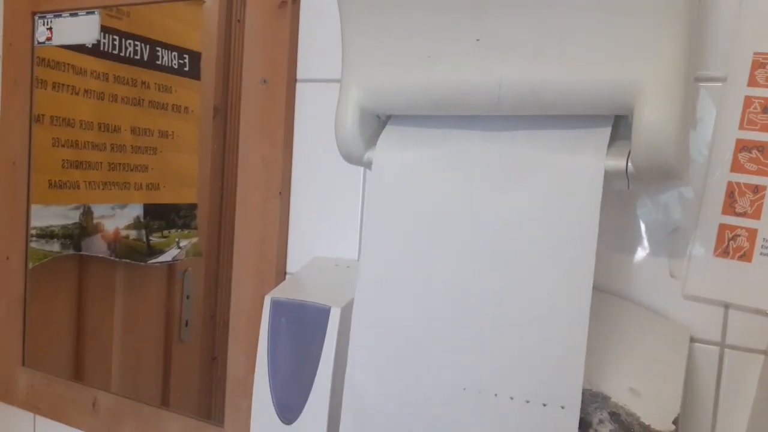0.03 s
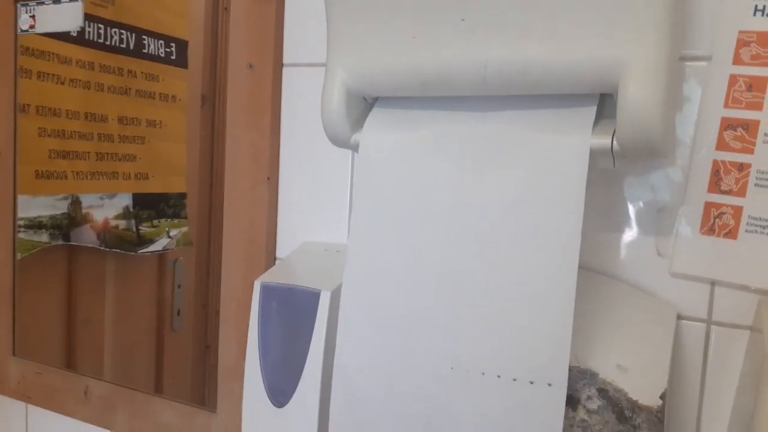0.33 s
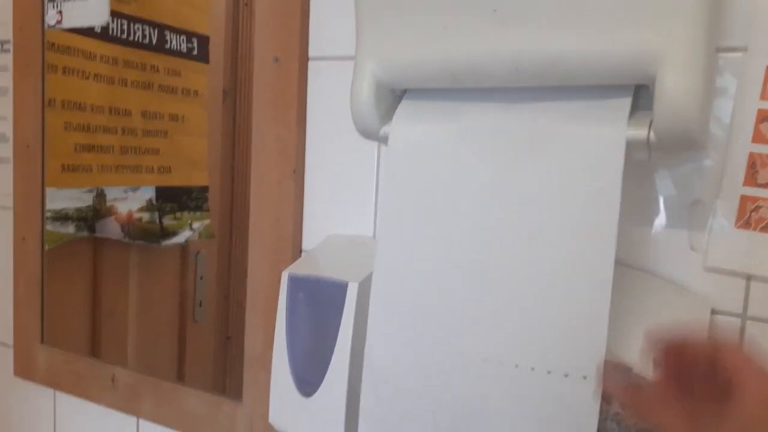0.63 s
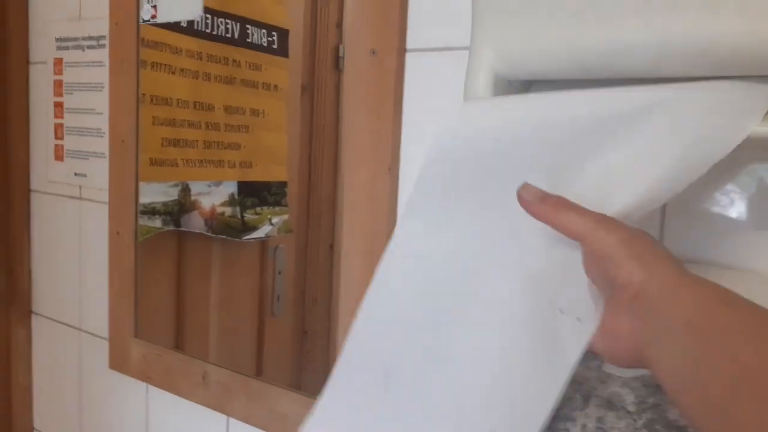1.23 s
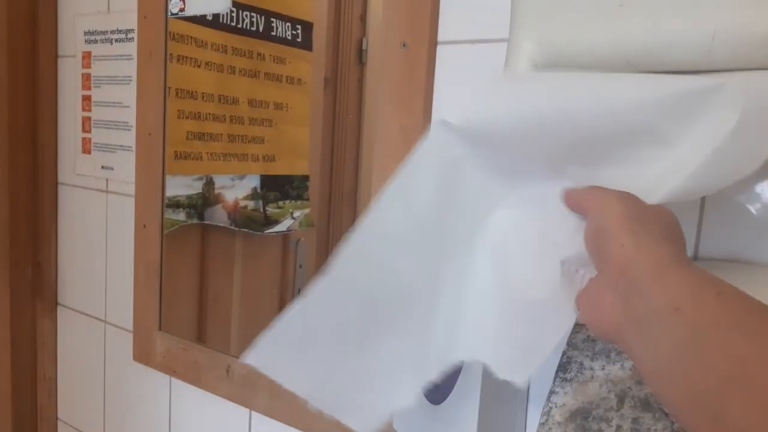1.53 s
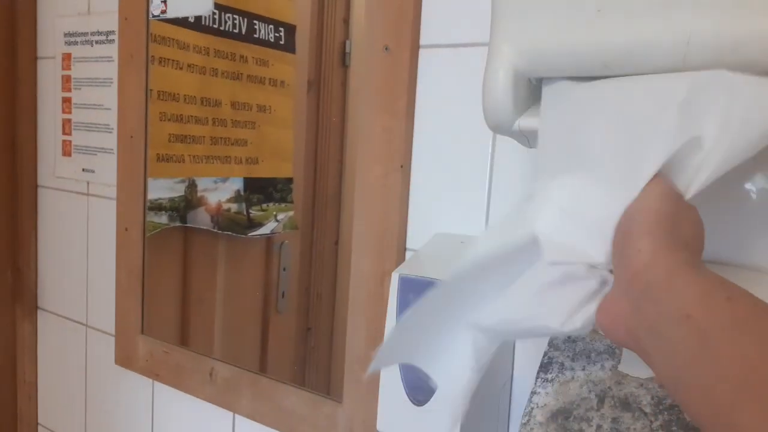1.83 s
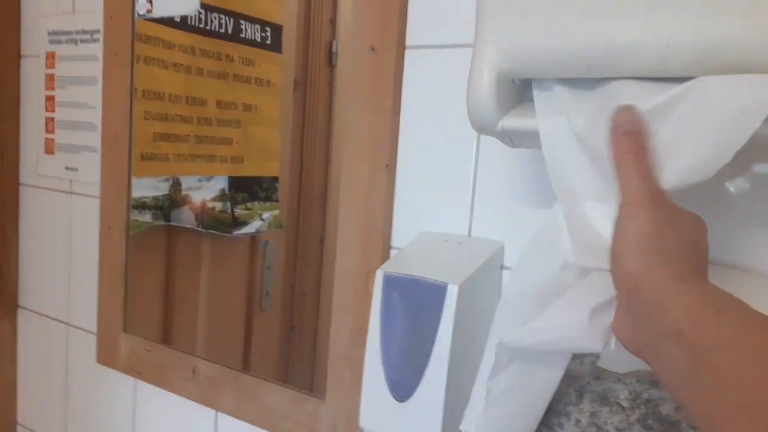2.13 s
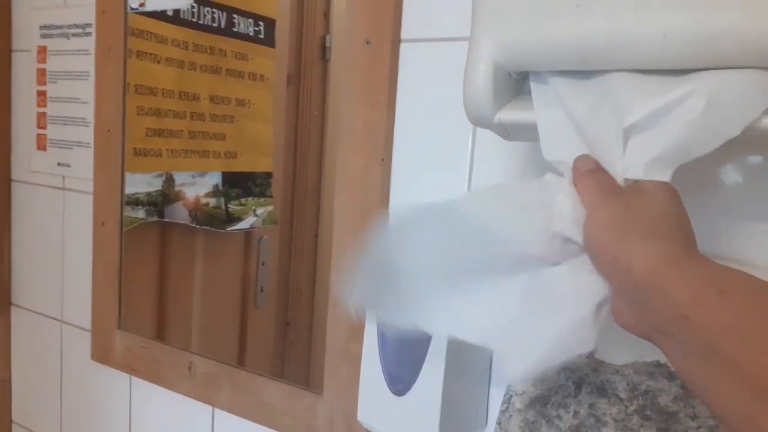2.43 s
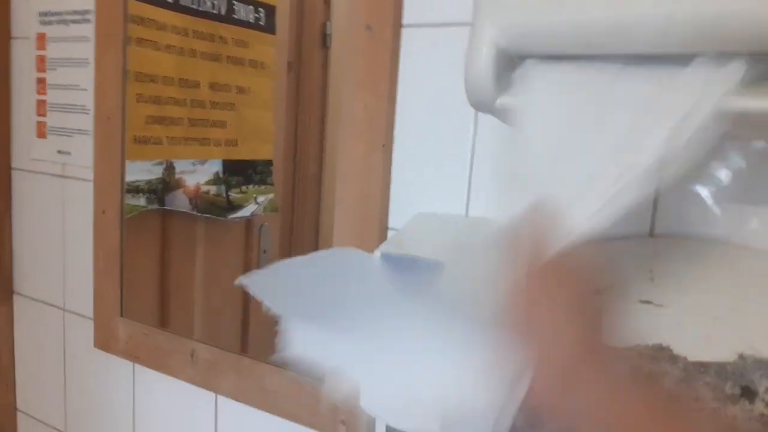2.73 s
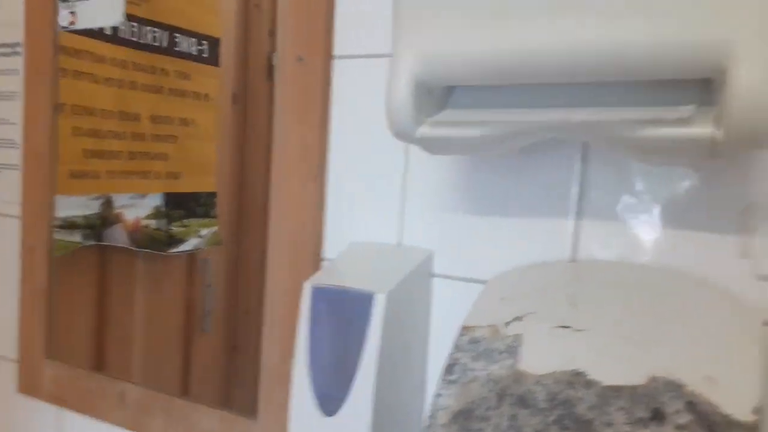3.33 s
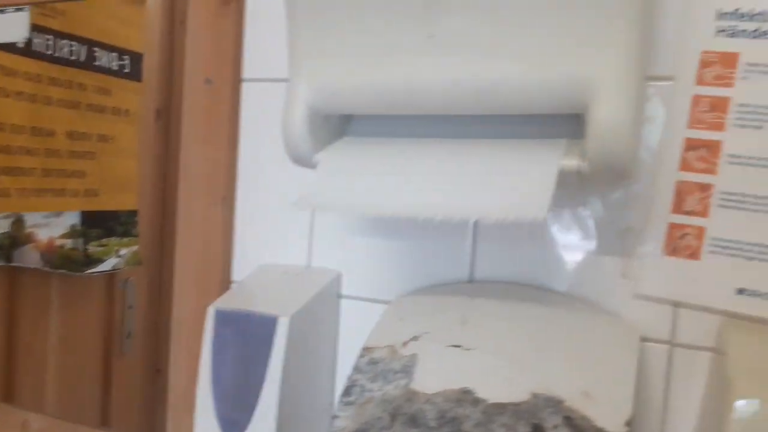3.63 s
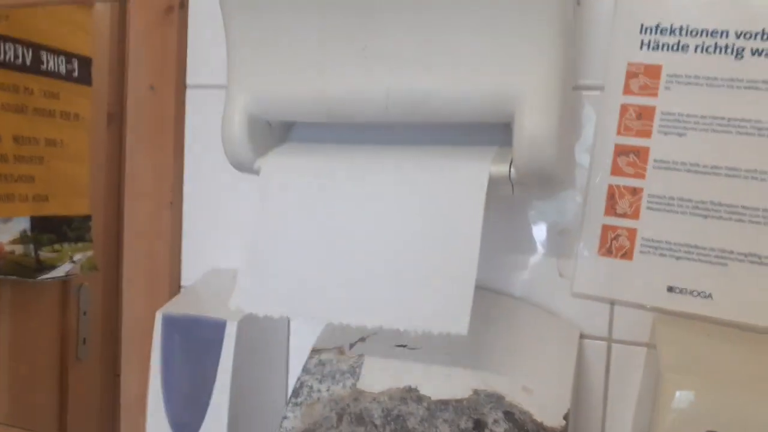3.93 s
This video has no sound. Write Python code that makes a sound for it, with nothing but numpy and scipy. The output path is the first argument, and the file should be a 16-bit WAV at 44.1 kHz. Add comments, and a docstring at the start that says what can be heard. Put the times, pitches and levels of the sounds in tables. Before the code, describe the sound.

An automatic paper towel dispenser is used close to the microphone in a tiled washroom. After a fading echo, the sheet rustles and crumples, tears off sharply, and the motor feeds more paper with a loud, buzzing whine.

```python
"""A tiled washroom: a paper towel is gathered in one hand and ripped off an automatic dispenser.
The echo of the last feed is still dying away as the sheet crackles, buckles and slides in the fingers.
It zips across the serrated blade and shakes the casing; then the geared motor spins up, hunts briefly
and whines on, its teeth rattling once a turn. A finger bumps the right microphone."""
import sys
import numpy as np
from scipy import signal
from scipy.fft import rfft, irfft
from scipy.io import wavfile
from scipy.ndimage import uniform_filter1d, map_coordinates

SR = 44100
rng = np.random.default_rng(int(sys.argv[2]) if len(sys.argv) > 2 else 0)


def wav_record(signal):
    """Record a signal, one row per channel, as 16-bit PCM in the file named by sys.argv[1]."""
    frames = np.transpose(np.atleast_2d(signal))
    bounded = np.clip(frames, -1, 1)
    # unit amplitude maps onto the largest positive 16-bit level
    quanta = np.round(bounded * 32767).astype(np.int16)
    wavfile.write(sys.argv[1], SR, quanta)


N = 176400
T = np.arange(N) / SR
TEETH, MOTOR_START_S = 16, 2.835
# The dull tone of flapping paper. Each row: frequency in Hz, relative level in dB.
FLAP_TONE = [(30, -59), (90, -11), (200, -3.5), (400, -1), (750, -14), (1300, -3), (3000, -14),
             (8000, -18.5), (15000, -41)]


def undb(db):
    """Decibels to gain."""
    return 10 ** (np.asarray(db) / 20)


def curve(rows, axis=1):
    """One column of a table, joined by straight lines in time."""
    rows = np.array(rows)
    return np.interp(T, rows[:, 0], rows[:, axis])


def unit(x):
    """Scale each channel to rms 1."""
    return x / np.sqrt(np.mean(x ** 2, axis=-1, keepdims=True))


def pan(db):
    """Gains for a source that is db louder on the left."""
    gains = undb(np.array([[db], [-db]]) / 2)
    return gains / gains.mean()


def walk(hz):
    """A smooth random wobble of rms 1, moving at rates up to about hz."""
    lowpass = np.exp(-(np.fft.rfftfreq(N, 1 / SR) / hz) ** 2)
    return unit(irfft(rfft(rng.standard_normal(N)) * lowpass, N))


def colour(x, points):
    """Minimum-phase EQ through (Hz, dB) points; the result has rms 1."""
    hz, db = np.array(points).T
    gain = undb(np.interp(np.log(np.fft.rfftfreq(N, 1 / SR) + 1), np.log(hz), db))
    cepstrum = irfft(np.log(gain), N)
    cepstrum[1:N // 2] *= 2
    cepstrum[N // 2 + 1:] = 0
    return unit(irfft(rfft(x) * np.exp(rfft(cepstrum)), N))


def grains(rate, spread_db, shared):
    """Random clicks, rate a second, scattered in size; a share reaches both microphones alike."""
    size = undb(spread_db * np.minimum(rng.exponential(size=(3, N)), 5))
    clicks = unit((rng.random((3, N)) < rate / SR) * size * rng.choice([-1, 1], (3, N)))
    return np.sqrt(shared) * clicks[2] + np.sqrt(1 - shared) * clicks[:2]


def burst(start, attack, hold, release):
    """Linear attack and exponential release, in seconds; the hold counts from the start."""
    return np.clip((T - start) / attack, 0, 1) * np.exp(-np.maximum(T - start - hold, 0) / release)


def die_away(x):
    """Let each band fade at the tiled room's own rate."""
    # Each row: frequency in Hz, reverb time (t60) in seconds.
    reverb_times = [(100, 1.76), (300, 0.84), (1100, 0.99), (3500, 0.9), (8000, 0.43), (16000, 0.39)]
    hz, t60 = np.array(reverb_times).T
    f, t, bands = signal.stft(x, SR, nperseg=512)
    fade = 1000. ** (-t / np.interp(np.log(f + 1), np.log(hz), t60)[:, None])
    return signal.istft(bands * fade, SR, nperseg=512)[1][..., :N]


def room(x, wet_db, near_db=-11):
    """Reflections off the nearby wall and the long ring of the tiles; the power is kept."""
    near = unit(rng.standard_normal((2, N)) * burst(.001, .001, 0, .004))
    far = unit(die_away(rng.standard_normal((2, N))) * np.clip((T - .006) / 0.0069, 0, 1))
    response = (undb(near_db) * near + undb(wet_db) * far) / np.sqrt(N)
    x = x * np.ones((2, 1))
    return unit(x + signal.fftconvolve(x, response, axes=1)[:, :N]) * np.sqrt(np.mean(x ** 2))


def room_tone():
    """A faint, steady bed of low noise."""
    # Each row: frequency in Hz, relative level in dB.
    bed_tone = [(29, -72), (50, -39), (70, -14.5), (157, -18), (190, -14.5), (253, -15), (292, -3.5),
                (408, -15.5), (613, -15), (1670, -24.5), (3580, -23.5), (6350, -34.5), (15000, -40)]
    return colour(grains(rate=27000, spread_db=0, shared=.4), bed_tone) * undb(-69) * pan(14)


def last_feed():
    """The whine and clatter of the previous feed fade in the room; the whine drops out for a moment."""
    # Tones hanging in the room. Each row: pitch in Hz, level before the fade in dB, waver in radians.
    tones = [(1123, -38, 0.34), (1188, -52, .5), (2270, -55, 1.0), (3360, -58.5, 1.8)]
    # The clatter's echo. Each row: frequency in Hz, relative level in dB.
    echo_tone = [(60, -40), (150, -14.5), (500, 3), (1000, -3), (1700, -0.5), (2800, -16.5), (3500, -12.5),
                 (6000, -27.5), (15000, -42)]
    whine = sum(undb(db + 2.3 * walk(54)) * np.sin(2 * np.pi * hz * T + waver * walk(34))
                for hz, db, waver in tones)
    dip = 1 - np.exp(-((T - .428) / .022) ** 2)
    clatter = colour(rng.standard_normal((2, N)), echo_tone) * undb(-42)
    return die_away(whine * dip * burst(-0.011, 0.0091, 0.54, .02) * pan(13) + clatter * pan(8.3))


def flex(x, spread_db):
    """Resonances come and go as the sheet changes shape; the result has rms 1."""
    bands = signal.stft(x, SR, nperseg=512)[2]
    drift = rng.standard_normal(bands.shape[1:])
    for _ in range(2):
        drift = uniform_filter1d(uniform_filter1d(drift, size=11, axis=0), size=9, axis=1)
    return unit(signal.istft(bands * undb(spread_db * drift / drift.std()), SR, nperseg=512)[1][..., :N])


def tick(s, db, hz):
    """One crease snaps with its own brightness."""
    tone = [(hz / 20, -50), (hz / 2, -9), (hz, 0), (hz * 2, -14)]
    fibres = colour(grains(rate=20000, spread_db=2, shared=0.57), tone)
    return fibres * undb(db) * burst(s - .001, .0003, 0.00068, 0.0009)


def crumple():
    """A light brush, then the hand closes: fibres crackle, creases snap, folds flap, the sheet hisses."""
    # How hard the hand works the sheet. Each row: time in seconds, level in dB.
    handling = [(.992, -79), (1.003, -60), (1.096, -54.5), (1.29, -55), (1.32, -46.5), (1.385, -49),
                (1.42, -44.5), (1.45, -53.5), (1.6, -53.5), (1.622, -42.5), (1.676, -48.5), (1.71, -41),
                (1.87, -40.5), (1.98, -46), (2.028, -41.5), (2.08, -39), (2.2, -47), (2.28, -47.5),
                (2.358, -40), (2.405, -49), (2.44, -39.5), (2.465, -40.5), (2.496, -37.5), (2.54, -48),
                (2.67, -47.5), (2.73, -34), (2.79, -36), (2.85, -40), (2.9, -58)]
    # The tones of fibres, creases and sliding paper. Each row: frequency in Hz, relative level in dB.
    fibre_tone = [(35, -39), (60, -19.5), (123, -10), (376, -1), (521, -7), (688, -9), (953, -6),
                  (2360, -9), (3600, -6), (4740, -12.5), (7720, -13), (9080, -17), (12600, -16.5),
                  (15500, -19.5)]
    crease_tone = [(100, -36), (600, -1.5), (1500, -0.5), (3500, 1.5), (8000, -5), (15000, -10)]
    slide_tone = [(1500, -37), (4500, -4), (7500, 1), (9500, -4), (13500, -7), (15500, -10.5)]
    # Folds that buckle. Each row: time in seconds, level in dB.
    buckles = [(1.1, -52), (1.355, -53), (1.42, -41), (1.621, -37.5), (1.635, -37), (2.065, -38.5)]
    # Single creases. Each row: time in seconds, level in dB, centre in Hz.
    ticks = [(1.034, -45, 1500), (1.414, -37, 3020), (1.5661, -39.5, 6500), (1.704, -30, 4430),
             (1.73, -37, 8000), (1.747, -44, 12000), (2.058, -27, 4000)]
    # Slips through the fingers. Each row: start in seconds, length in seconds, level in dB.
    slides = [(1.08, 0.34, -54.5), (1.747, 0.21, -46.5), (1.986, 0.081, -39.5), (2.074, 0.16, -45),
              (2.32, .04, -44.5)]
    effort = undb(curve(handling) + 1.5 * walk(39))
    fibres = colour(grains(rate=9000, spread_db=3, shared=0.58), fibre_tone)
    crackle = flex(fibres, spread_db=1.5) * undb(1.8)
    snaps = colour(grains(rate=480, spread_db=1, shared=0.82), crease_tone) * undb(-8.5)
    flaps = sum(undb(db) * burst(s - .002, 0.0019, 0.0026, 0.007) for s, db in buckles)
    folds = flaps * colour(grains(rate=8500, spread_db=2, shared=0.9), FLAP_TONE)
    brush = undb(-63) * burst(0.247, .008, 0.018, 0.019) * colour(rng.standard_normal((2, N)), crease_tone)
    creases = sum(tick(s, db, hz) for s, db, hz in ticks)
    sliding = sum(undb(db) * burst(s, 0.023, length, 0.013) for s, length, db in slides)
    hiss = sliding * colour(grains(rate=8000, spread_db=2.5, shared=0.19), slide_tone)
    taut = undb(-48.5) * burst(1.405, 0.016, 0.034, 0.075)
    drum = taut * np.sin(2 * np.pi * 428 * T + .6 * walk(60))  # the taut sheet hums
    paper = effort * (crackle + snaps) + folds + brush + creases + hiss + drum
    return room(paper, wet_db=-11.5) * pan(7.96)


def hum(hz=316, sag_hz_per_s=55, db=-66):
    """A faint low tone sinks and fades in the pause."""
    phase = 2 * np.pi * np.cumsum(hz - sag_hz_per_s * (T - .6)) / SR
    tone = np.sin(phase + 0.85 * walk(28)) * undb(db + 1.9 * walk(25))
    return tone * burst(0.36, .04, 0.19, 0.18) * pan(6.7)


def squeak(hz=3790, db=-69):
    """A thin, faint squeak in the pause."""
    return np.sin(2 * np.pi * hz * T + 1.1 * walk(90)) * undb(db) * burst(.41, .03, 0.071, .04)


def mic_bumps(low_hz=56):
    """A finger sends pressure pulses into the right microphone, rung out by its bass cut."""
    # Each row: start in seconds, relative pressure, rise in seconds, fall in seconds.
    bumps = [(2.4227, 0.36, 0.0001, 0.0012), (2.5728, 0.71, 0.000097, 0.0011), (3.629, 0.24, 0.002, 0.0017)]
    pressure = sum(size * burst(s, rise, 0, fall) for s, size, rise, fall in bumps)
    bass_cut = signal.butter(4, low_hz, "high", fs=SR, output="sos")
    return signal.sosfilt(bass_cut, pressure) * np.array([[0], [1]])


def rip():
    """The sheet zips across the serrated blade, flutters and shakes the casing."""
    # The tone of the tear. Each row: frequency in Hz, relative level in dB.
    tear_tone = [(120, -37), (200, 0), (596, -10), (957, -6), (1500, -8), (4100, -5.5), (5010, -13),
                 (8200, -11), (15500, -16.5)]
    # The casing's modes. Each row: pitch in Hz, relative level in dB, ring time (t60) in seconds.
    modes = [(167, -2, 0.15), (218, -2, 0.17), (308.6, 1.5, 0.27), (368, -13, 0.097), (438, -1.5, 0.13),
             (492, -5, 0.14), (594, 2.5, 0.076), (761, -1, 0.066)]
    pull = undb(-16.5) * burst(2.734, 0.00079, 0.038, 0.0047)
    tear = pull * colour(grains(rate=5100, spread_db=4, shared=0.29), tear_tone)
    ring = sum(undb(db) * np.sin(2 * np.pi * (hz * T + rng.random()) + .5 * walk(64))
               * burst(2.748, 0.027, .032, t60 / np.log(1000)) for hz, db, t60 in modes)
    flapping = undb(-27) * burst(2.75, 0.018, 0.045, 0.076)
    flutter = flapping * colour(grains(rate=3300, spread_db=1.5, shared=0.85), FLAP_TONE)
    return room(tear + flutter, wet_db=-13) * pan(7.2) + room(ring * undb(-26.5), wet_db=-4) * pan(7.8)


def pinion_whine(mesh):
    """The tooth-rate tone swells and fades as the microphones move through its standing waves."""
    # Each row: time in seconds, left level in dB, right level in dB, left phase lead in radians.
    swells = [(2.84, -23.5, -34, 0), (2.868, -27.5, -36, -0.5), (2.882, -20.5, -23, -0.5),
              (2.905, -25, -29, 0.5), (2.965, -13, -22, -0.8), (3.04, -22, -23, -0.5),
              (3.13, -27.5, -21.5, 0.5), (3.22, -28, -22.5, 3), (3.27, -17, -24, 2.5),
              (3.33, -26.5, -23.5, 2), (3.39, -17, -25.5, 1.7), (3.46, -23.5, -19, 1.7),
              (3.57, -27.5, -20, 0), (3.64, -16.5, -25, 0.56), (3.735, -22.5, -18, 2.4),
              (3.81, -15.5, -20, 3), (3.865, -30, -19, 0.8), (3.92, -20, -17.5, 1.15),
              (4.0, -24.5, -20.5, 1)]
    rough = .17 + .3 * burst(MOTOR_START_S, .001, .26, .15)  # rougher until the speed settles
    sides = [(curve(swells, 1), mesh + curve(swells, 3)), (curve(swells, 2), mesh)]
    return np.sqrt(2) * np.array([
        undb(db) * (np.sin(phase) * (1 + rough * walk(78)) + rough * walk(90) * np.cos(phase))
        for db, phase in sides])


def shaft_drone(turns):
    """Uneven teeth add wavering harmonics of the shaft rate."""
    # Each row: multiple of the shaft rate, relative level in dB.
    harmonics = [(3, -12.5), (6, -18), (8, -16.5), (9, -12), (10, -15.5), (12, -9), (13, -12.5),
                 (14, -14.5), (15, 2), (17, 0), (18, -7), (19, -7), (20, -14.5), (21, -8.5), (22, -14.5)]
    return unit(sum(undb(db + 2.1 * walk(13.4)) * np.sin(2 * np.pi * (k * turns + rng.random()))
                    for k, db in harmonics))


def gear_overtones(turns, mesh):
    """Overtones of the whine, their phase swaying with the slack once a turn."""
    # Each row: multiple of the tooth rate, relative level in dB.
    overtones = [(2, -2), (3, -3), (4, -13), (6, -22.5), (7, -18.5)]
    slack = .5 * np.sin(2 * np.pi * turns) + .14 * walk(77)
    return np.sqrt(2) * sum(undb(db + 3.03 * walk(26)) * np.sin(k * (mesh + slack)) for k, db in overtones)


def gearbox_strain(mesh):
    """The whine's second harmonic sweeps through the gearbox resonances on the way up."""
    # Each row: frequency in Hz, relative level in dB.
    resonances = [(1150, -20), (1480, 0.5), (1700, -12.5), (1930, 3.5), (2250, -16)]
    sweep = burst(2.842, 0.0017, 0.026, 0.0058) * np.sin(2 * mesh + walk(290))
    return colour(sweep, resonances) * undb(-43.5)


def gear_rattle(turns, mesh):
    """Each tooth knocks with its own weight, a rattle that repeats every turn; the housing rumbles."""
    # The tones of the gears and their housing. Each row: frequency in Hz, relative level in dB.
    rattle_tone = [(1000, -43), (1700, -18.5), (2080, -10.5), (2260, -5.5), (2460, -8), (2850, -14),
                   (3020, -14.5), (3280, -6), (3450, -4), (3700, -11), (4530, -8.5), (5100, -15.5),
                   (5650, -15), (6200, -19.5), (6700, -17), (7200, -19.5), (7960, -18), (9500, -27),
                   (10100, -26), (11600, -30), (12500, -26.5), (15500, -33.5)]
    housing_tone = [(25, -50), (60, -34), (110, -16), (200, -4), (400, -9.5), (700, -3.5), (1200, -1),
                    (1700, -3.5), (2300, -6.5), (4000, -50.5)]
    tooth_db = 1.9 * unit(rng.standard_normal(TEETH))
    tooth = (turns * TEETH).astype(int) % TEETH
    knocks = undb(tooth_db[tooth] + 1.3 * np.cos(2 * np.pi * turns) + 2.5 * np.cos(mesh))
    # the same rough flanks scrape past on every turn, so the treble buzzes
    flanks = np.array([map_coordinates(surface, [turns % 1 * len(surface)], mode="grid-wrap")
                       for surface in rng.standard_normal((2, 600))])
    scrape = grains(rate=16000, spread_db=1.3, shared=0.19) + .5 * unit(flanks)
    rattle = colour(scrape * knocks, rattle_tone)
    rumble = colour(grains(rate=8000, spread_db=1.5, shared=0.85) * knocks, housing_tone)
    return undb(2.5) * rattle + undb(-7.5) * rumble


def motor(hunt_hz=17.5, hunt_decay_s=0.15, roller_hz=11.4):
    """The geared motor spins up, overshoots and hunts; its load pulses as the roller turns."""
    # The motor's speed. Each row: time in seconds, tooth rate in Hz.
    speed = [(2.8, 300.3), (2.845, 720.4), (2.865, 942), (2.885, 1122), (2.93, 1155), (3.0, 1153),
             (3.12, 1118), (3.28, 1131), (3.45, 1134), (3.58, 1123), (3.8, 1131), (4.0, 1126)]
    # How hard the gears are driven. Each row: time in seconds, level in dB.
    drive = [(2.84, -34.5), (2.87, -33), (2.885, -25.5), (2.905, -26), (2.965, -29.5), (4.0, -28.5)]
    since_peak = T - 2.905
    settling = np.exp(-np.maximum(since_peak, 0) / hunt_decay_s) * (since_peak > -.25 / hunt_hz)
    hunt = np.cos(2 * np.pi * hunt_hz * since_peak) * settling
    roller = np.cos(2 * np.pi * roller_hz * (T - 3.4))
    tooth_hz = curve(speed) * (1 + 0.0503 * hunt + 0.0029 * roller + 0.00204 * walk(44.5))
    turns = np.cumsum(tooth_hz) / SR / TEETH
    mesh = 2 * np.pi * TEETH * turns  # phase, one cycle a tooth
    on = np.clip((T - MOTOR_START_S) / 0.0073, 0, 1)
    load = on * undb(curve(drive) + 7 * hunt + roller)
    whine = pinion_whine(mesh) * on * undb(1.4 * hunt + roller)
    # the overshoot sets a room resonance ringing, which beats against the settling whine
    ringing = np.sin(2 * np.pi * 1171 * T + .2 * walk(20)) * undb(-22) * burst(2.95, .05, .14, .13)
    shaft = load * shaft_drone(turns) * undb(-0.5)
    gears = load * gear_overtones(turns, mesh) + gearbox_strain(mesh) + load * gear_rattle(turns, mesh)
    return (whine + ringing * pan(14) + room(gears, wet_db=-4.5) * pan(6.9)
            + room(shaft, wet_db=-8) * pan(7.8))


def scene(left_lag_s=.0001):
    """Echo, paper and motor over the room tone, reaching the right microphone a moment sooner."""
    left, right = room_tone() + last_feed() + hum() + squeak() + crumple() + rip() + motor()
    late_left = np.pad(left, (round(left_lag_s * SR), 0))[:N]
    return np.array([late_left, right]) + mic_bumps()


def record(dry, top_hz=15900):
    """Peaks are clipped just under full scale and the very top is cut."""
    top_cut = signal.ellip(10, .2, 80, top_hz, fs=SR, output="sos")
    return signal.sosfilt(top_cut, np.clip(dry, -.95, .95))


dry = scene()
out = record(dry)
wav_record(out)
```